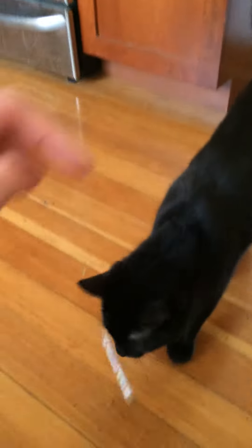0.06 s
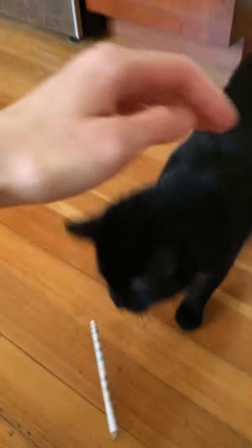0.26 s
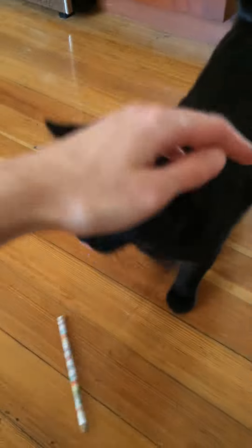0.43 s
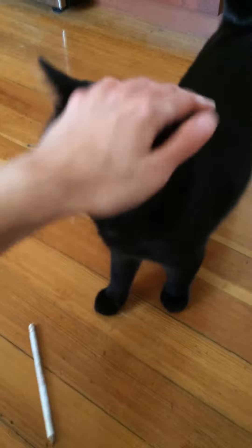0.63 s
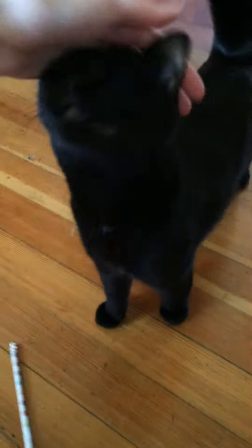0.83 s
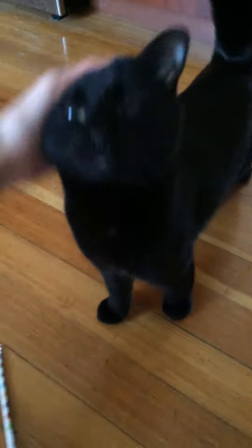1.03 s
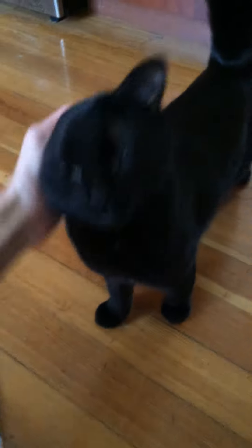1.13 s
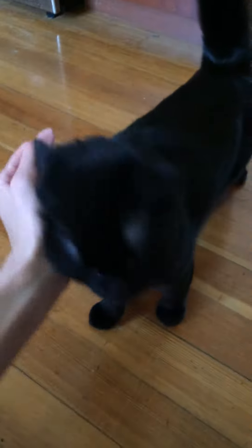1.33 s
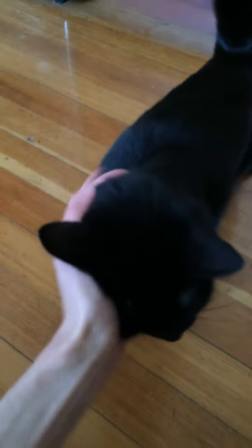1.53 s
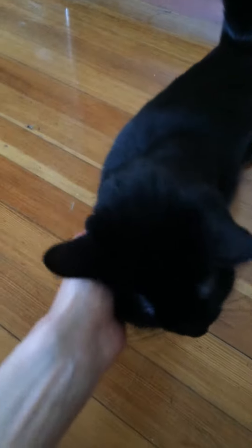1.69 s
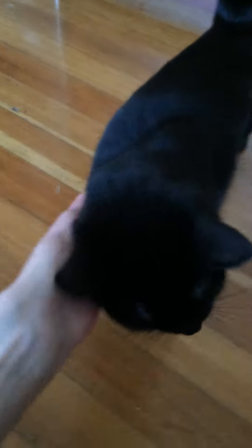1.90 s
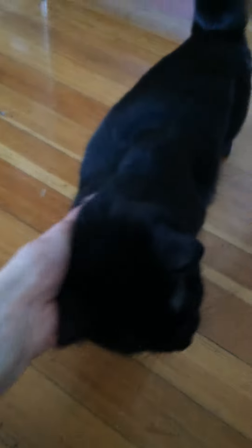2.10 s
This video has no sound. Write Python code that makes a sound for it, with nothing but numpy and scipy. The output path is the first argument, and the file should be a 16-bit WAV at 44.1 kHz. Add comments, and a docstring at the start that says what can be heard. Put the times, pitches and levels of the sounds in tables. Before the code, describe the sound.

A pencil strikes a wooden floor at about 0.2 seconds and bounces in quick, sharp, ringing clacks with a short kitchen echo, weakening until 0.7. It settles with a brief buzz and rolls away with a soft patter and small ticks, fading by 1.6. From about 1 to 2.2 seconds, a nearby hand very faintly strokes a cat's fur. An appliance hums quietly throughout.

```python
"""A pencil clacks end to end on a wooden floor, buzzes to rest and rolls away.
Each clack is a sharp snap and a burst of wood vibration that rings the pencil's bending modes
and echoes round a kitchen. The roll is a patter of small bumps with a few larger ticks.
An appliance hums throughout, and close by a hand faintly strokes a cat's fur."""
import sys
import numpy as np
from scipy import signal
from scipy.fft import rfft, irfft
from scipy.io import wavfile
from scipy.ndimage import uniform_filter1d

SR = 44100
rng = np.random.default_rng(int(sys.argv[2]) if len(sys.argv) > 2 else 0)


def put_to_file(sound):
    """Save the sound as 16-bit audio at rate SR, in the file named by the first command-line argument."""
    columns = np.atleast_2d(sound).T  # one column per channel
    safe = np.clip(columns, -1, 1)
    whole_steps = np.round(safe * 32767)
    wavfile.write(sys.argv[1], SR, whole_steps.astype(np.int16))


N = 94815

# the pencil's bending modes, ringing freely between bounces: (pitch [Hz], level [dB], t60 [s])
PENCIL_MODES = [(611, -14, .04), (1706, -11.5, 0.021), (3480, -14, 0.032), (5063, -6.5, .1),
                (7680, -11, 0.1), (10750, -14.5, 0.0602)]


def amp(db):
    """Decibels to gain."""
    return 10 ** (np.asarray(db) / 20)


def unit_energy(x):
    """Scales to an energy of 1."""
    return x / np.sqrt(np.sum(x ** 2) + 1e-20)


def unit_rms(x):
    """Scales to an rms of 1."""
    return unit_energy(x) * np.sqrt(len(x))


def decay(t, t60):
    """An envelope that falls 60 dB in t60 seconds."""
    return np.exp(-np.log(1000) * t / t60)


def curve_at(points, hz, column=1):
    """Reads a curve on a log-frequency axis."""
    points = np.array(points)
    return np.interp(np.log(hz + 1), np.log(points[:, 0] + 1), points[:, column])


def add(mix, start, sound):
    """Mixes a sound in at a time in seconds."""
    part = mix[max(round(start * SR), 0):][:len(sound)]
    part += sound[:len(part)]


def colour(x, eq):
    """Shapes a sound with an EQ curve."""
    return irfft(rfft(x) * amp(curve_at(eq, np.fft.rfftfreq(len(x), 1 / SR))), len(x))


def causal_colour(x, eq, size=4096):
    """Minimum-phase EQ: attacks are not blurred backwards."""
    log_gain = np.log(amp(curve_at(eq, abs(np.fft.fftfreq(size, 1 / SR)))))
    taps = np.fft.ifft(np.exp(np.conj(signal.hilbert(log_gain)))).real
    return signal.fftconvolve(x, taps[:size // 2])[:len(x)]


def resonance(x, hz, width_hz):
    """A resonant band-pass with a peak gain of 1."""
    return signal.lfilter(*signal.iirpeak(hz, hz / width_hz, SR), x)


def wander(count, rate_hz, step=32):
    """Smooth random motion with an rms near 1."""
    size = N // step + 2
    hz = np.fft.rfftfreq(size, step / SR)
    slow = irfft(rfft(rng.standard_normal(size)) * np.exp(-(hz / rate_hz) ** 2), size)
    return np.interp(np.arange(count) / step, np.arange(size), unit_rms(slow))


def appliance_hum():
    """Low tones of an appliance, each wavering in level and phase."""
    # hum tones: (pitch [Hz], rms level [dB])
    tones = [(120.2, -53.5), (86.2, -72.5), (199.5, -79)]
    t = np.arange(N) / SR
    hum = np.zeros(N)
    for hz, db in tones:
        waver = 1 + 0.077 * wander(N, 9.2)
        phase = 2 * np.pi * hz * t + 0.22 * wander(N, 5)
        hum += amp(db) * np.sqrt(2) * waver * np.sin(phase)
    return hum


def room_air():
    """The still air of the kitchen: a soft, bass-heavy noise bed."""
    # room tone: (frequency [Hz], level [dB])
    air_eq = [(15, -51.5), (25, -23.5), (64, -10.5), (95, -7.5), (121, -8.5), (146, -8.5), (176, -20),
              (363, -24.5), (515, -27.5), (790, -29), (2300, -38.5), (2630, -38.5), (15000, -50.5)]
    return amp(-60) * unit_rms(colour(rng.standard_normal(N), air_eq))


def stroke(length, db, eq):
    """Hairs slide under the hand: an uneven hiss that swells and fades."""
    count = int(length * SR)
    hiss = colour(rng.standard_normal(N), eq) * np.exp(0.15 * wander(N, 60))
    return amp(db) * unit_rms(hiss[:count]) * np.sin(np.linspace(0, np.pi, count))


def petting():
    """A hand passes over the cat's fur in airy strokes and one duller brush."""
    # strokes: (time [s], length [s], level [dB])
    strokes = [(.08, 0.045, -86), (1.05, 0.049, -72.5), (1.48, 0.21, -69.5), (1.819, 0.072, -74),
               (2.04, 0.2, -63)]
    # hiss of the fur: (frequency [Hz], level [dB])
    fur_eq = [(200, 11), (600, -6), (1500, -5.5), (3800, -3), (6500, -5.5), (10000, -9), (15000, -14)]
    # soft brush of the hand: (time [s], length [s], level [dB])
    brush = (1.67, 0.12, -66)
    # its darker tone: (frequency [Hz], level [dB])
    brush_eq = [(200, 1), (600, -8), (1200, 5), (2000, -5), (3200, -7), (5000, -20), (12000, -29)]
    out = np.zeros(N)
    for start, length, db in strokes:
        add(out, start, stroke(length, db, fur_eq))
    start, length, db = brush
    add(out, start, stroke(length, db, brush_eq))
    return out


def smooth_burst(x, evenness=0.85, width_hz=350, size=2048):
    """Evens out the chance peaks and hollows in the spectrum of a short burst."""
    power = uniform_filter1d(abs(rfft(x, size)) ** 2, int(width_hz * size / SR))
    gain_db = -evenness * 10 * np.log10(power / power.mean() + 1e-6)
    return causal_colour(x, np.c_[np.fft.rfftfreq(size, 1 / SR), gain_db])


def wood_knock(t, bands_db, snap=6.2):
    """The tip snaps against the boards and sets off dense wood vibration that dies fast."""
    # chatter of the tip within one contact: (delay [s], weight [gain])
    chatter = [(0, 0.59), (.00033, 0.49), (.00055, .45)]
    # edges of the knock's six bands, low to high: (frequency [Hz])
    edges = [100, 400, 1000, 2400, 5500, 10000, 15500]
    # decay of the wood in each band: (t60 [s])
    band_t60s = [0.027, 0.0095, 0.015, 0.014, 0.011, 0.0076]
    grain = rng.standard_normal(len(t))
    contact, knock = np.zeros((2, len(t)))
    for delay, weight in chatter:
        add(contact, delay * (1 + 0.22 * rng.uniform(-1, 1)), np.array([weight]))
    force = []  # spectrum of the blow: (band centre [Hz], strength [dB])
    for low, high, db, t60 in zip(edges, edges[1:], bands_db, band_t60s):
        blow = smooth_burst(grain * decay(t, t60) - snap * contact)
        band = signal.butter(3, [low, high], "bandpass", fs=SR, output="sos")
        knock += amp(db + 2) * unit_energy(signal.sosfilt(band, blow))
        force.append((np.sqrt(low * high), db))
    return knock, force


def pencil_ring(t, hz, t60, flutter_hz=71.8):
    """One bending mode dies away; the pencil's spin makes it flutter and smear."""
    flutter = wander(len(t), flutter_hz) + 1j * wander(len(t), flutter_hz)
    tone = ((1 + flutter) * np.exp(2j * np.pi * hz * t)).imag
    return unit_energy(tone * decay(t, t60))


def clack(bands_db, spot_hz, spot_width, spot_db, ring_db):
    """A knock excites the struck spot and the pencil, which rings on in the air."""
    # bending modes, broad while the pencil touches the floor: (pitch [Hz], width [Hz], level [dB])
    damped_modes = [(1808, 250, -3.5), (3500, 310, -3.5), (5050, 300, -4), (7500, 490, 4),
                    (10580, 650, 0.5), (13400, 870, -1)]
    t = np.arange(SR // 4) / SR
    knock, force = wood_knock(t, bands_db)
    out = knock + amp(spot_db) * resonance(knock, spot_hz, spot_width)
    for hz, width, db in damped_modes:
        out += amp(db + ring_db) * resonance(knock, hz, width)
    for hz, db, t60 in PENCIL_MODES:
        detuned = hz * (1 + 0.04 * rng.uniform(-0.55, 0.58))
        out += amp(db + ring_db + curve_at(force, hz)) * pencil_ring(t, detuned, t60)
    return out


def in_kitchen(sound, predelay_s=0.0013, build_s=0.016):
    """Adds first reflections and a diffuse tail, drawn afresh for each spot on the floor."""
    # reverb tail: (frequency [Hz], level [dB], t60 [s])
    reverb = [(100, -2.5, 0.26), (253.7, -4, 0.23), (494.3, -7.5, 0.35), (950.7, 0, 0.44),
              (1802, 0.5, 0.49), (3540, -2, 0.45), (5250, -5.5, 0.43), (7410, -4.5, 0.33), (9460, -6, 0.24),
              (11400, -9.5, 0.301), (14300, -12, 0.24)]
    # first reflections: (delay [s], level [dB])
    echoes = [(.0018, -14.5), (.0039, -14), (.009, -14.5), (0.014, -25.5)]
    # the reflecting surfaces dull them: (frequency [Hz], level [dB])
    echo_eq = [(200, 0), (4000, 2), (8000, -7), (14000, -12)]
    hz, t, noise = signal.stft(rng.standard_normal(SR), SR, nperseg=256)
    t60 = curve_at(reverb, hz, column=2)[:, None]
    gain = amp(curve_at(reverb, hz))[:, None]
    gain *= np.sqrt(2 * np.log(1000) / t60 / SR)  # a longer decay brings no extra energy
    response = signal.istft(noise * gain * decay(t, t60), SR, nperseg=256)[1][:SR]
    response *= np.clip((np.arange(SR) / SR - predelay_s) / build_s, 0, 1)
    early = np.zeros(SR // 20)
    for delay, db in echoes:
        add(early, delay * rng.uniform(0.9, 1.1), amp([db]))
    add(response, 0, colour(early, echo_eq))
    response[0] = 1  # direct sound
    return signal.fftconvolve(sound, response)


def settling(gap_s=0.009, fade_t60=0.48):
    """The pencil buzzes to rest: tiny fading bounces ring it, each at a slightly different pitch."""
    # the bounces favour the higher modes: (frequency [Hz], level [dB])
    force = [(600, -30), (3400, -15), (5050, .5), (7800, -5), (11000, -14.5)]
    t = np.arange(SR // 6) / SR
    times = np.cumsum(gap_s * rng.uniform(0.54, 1.4, size=32))
    out = np.zeros(SR)
    for start in times - times[0]:
        for hz, db, t60 in PENCIL_MODES:
            detuned = hz * (1 + 0.05 * rng.uniform(-0.496, 0.52))
            gain = amp(db + curve_at(force, hz)) * decay(start, fade_t60)
            add(out, start, gain * pencil_ring(t, detuned, t60))
    return amp(-16.5) * unit_energy(out)


def rolling(bumps_per_s=430):
    """The pencil rolls over the boards in small random bumps, with a few larger ticks."""
    # fader curve of the roll: (time [s], level [dB])
    fader = [(.64, -50), (.78, -61.5), (.93, -59.5), (1.0, -64), (1.17, -60), (1.26, -71), (1.32, -64.5),
             (1.47, -74), (1.6, -81)]
    # dull tone of the bumps: (frequency [Hz], level [dB])
    bump_eq = [(100, 10), (220, 1), (450, 1.5), (750, -4), (1100, 1), (1800, -1), (3200, -27), (5500, -28),
               (12000, -27)]
    # resonances of the pencil on the boards: (pitch [Hz], width [Hz], level [dB])
    rings = [(201, 23, 8.5), (416, 37, 9.5), (1044, 95, 3)]
    # ticks: (time [s], level [dB])
    ticks = [(0.92, -34.5), (.96, -34.5), (1.057, -32), (1.137, -31.5), (1.18, -35.5), (1.357, -47),
             (1.444, -43.5)]
    # their brighter tone: (frequency [Hz], level [dB])
    tick_eq = [(100, 14), (450, 3.5), (1200, 2), (3000, 4.5), (5000, -15), (12000, -20)]
    t = np.arange(N) / SR
    bumps = rng.standard_normal(N) * (rng.random(N) < bumps_per_s / SR)
    body = colour(bumps, bump_eq)
    body += sum(amp(db) * resonance(body, hz, width) for hz, width, db in rings)
    times, levels_db = np.transpose(fader)
    moving = (t > times[0]) & (t < times[-1])
    out = unit_rms(body) * amp(np.interp(t, times, levels_db)) * moving
    tick_envelope = (np.minimum(t / 0.0057, 1) * decay(t, t60=0.028))[:SR // 10]
    for start, db in ticks:
        noise = colour(rng.standard_normal(len(tick_envelope)), tick_eq)
        add(out, start, amp(db) * unit_energy(tick_envelope * noise))
    return out


def fur_swish(width_hz=450):
    """Hairs flick past the fingers at a falling rate: a narrow hiss that glides down."""
    # the swish: (time [s], length [s], level [dB], start pitch [Hz], end pitch [Hz])
    gesture = (1.53, .22, -75.5, 4200, 3050)
    start, length, db, from_hz, to_hz = gesture
    count = int(length * SR)
    glide = np.exp(2j * np.pi * np.cumsum(np.linspace(from_hz, to_hz, count)) / SR)
    hairs = wander(count, width_hz) + 1j * wander(count, width_hz)
    swell = np.sin(np.linspace(0, np.pi, count))
    out = np.zeros(N)
    add(out, start, amp(db) * (hairs * glide).real * swell)
    return out


def scene():
    """The pencil out in the room, the petting close and dry, the hum underneath."""
    # clacks: (time [s], six band strengths from low to high [dB], pitch of the struck spot [Hz],
    # its width [Hz], its level [dB], ring of the pencil [dB])
    clacks = [(0.221, -14.5, -9.5, -5, -7, -11, -20, 1752, 300, -5, -6),
              (0.2582, -6.5, -11.5, -6, -4, -1, 2.5, 6240, 600, 0, -9),
              (0.2769, -20, -22, -16, -16, -17, -22, 1950, 300, -3, -4),
              (0.2944, -19.5, -18, -14, -17, -12.5, -19, 8200, 900, 1, -8),
              (0.4086, -15, -19.5, -12, -10, -13.5, -13.5, 4200, 1500, -8.5, 1),
              (0.4262, -15.5, -16, -15.5, -15.5, -15.5, -15.5, 1800, 250, 4, 4),
              (0.4454, -17, -31, -20.5, -17.5, -29, -30, 2060, 300, 8, -3),
              (0.509, -23.5, -22, -18.5, -19, -18.5, -18.5, 3450, 250, -5, 3),
              (.5220, -18.5, -25.5, -17, -14, -15.5, -10.5, 3920, 900, 6.5, 0),
              (0.5797, -20.5, -24, -20.5, -27, -31, -28, 3500, 400, -6, 0.5),
              (0.5848, -22, -16.5, -14, -12, -12.5, -8, 2750, 300, 4.5, -7.5),
              (0.6257, -28, -27, -21.5, -17, -21, -28, 3550, 700, -8, 5.5),
              (0.6513, -36, -27.5, -21, -24, -29, -39, 3300, 500, -5, -2)]
    # tone of wood on wood: (frequency [Hz], level [dB])
    wood_eq = [(60, 1), (130, 5), (210, 2), (330, -3), (650, 1.5), (900, -4), (1250, -0.5), (1800, -1),
               (2300, -2), (3500, 1), (8500, 2), (10000, -2.5), (13500, -1.5), (15500, -15.5)]
    bounces = np.zeros(N)
    for start, *bands_db, spot_hz, spot_width, spot_db, ring_db in clacks:
        add(bounces, start, in_kitchen(clack(bands_db, spot_hz, spot_width, spot_db, ring_db)))
    add(bounces, 0.59, in_kitchen(settling()))
    mix = appliance_hum() + room_air() + causal_colour(bounces, wood_eq) + fur_swish()
    add(mix, 0, amp(-1.5) * in_kitchen(rolling()))
    mix += petting()
    return mix[None]


def record(dry, ceiling=0.7, cutoff_hz=15300):
    """Soft clipping rounds the hardest peaks, then a low-pass trims the top."""
    rounded = ceiling * np.tanh(dry / ceiling)
    low_pass = signal.firwin(201, cutoff_hz, window=("kaiser", 9), fs=SR)
    return signal.oaconvolve(rounded, low_pass[None], "same")


dry = scene()
out = record(dry)
put_to_file(out)
```